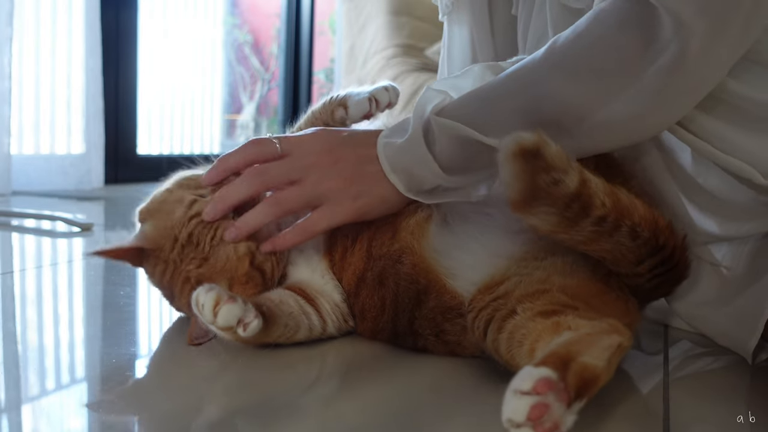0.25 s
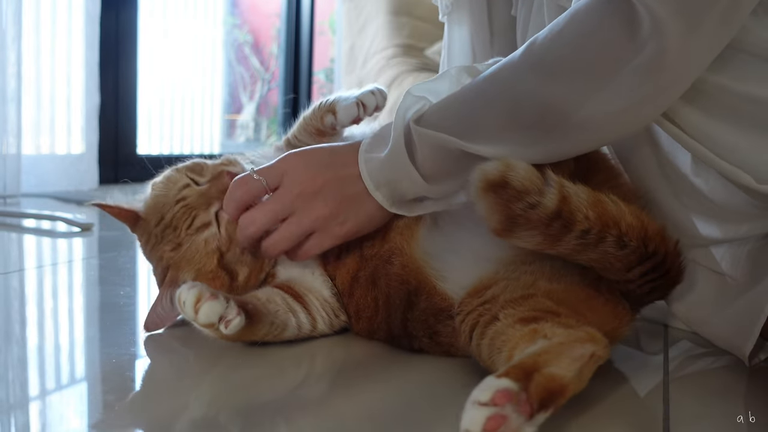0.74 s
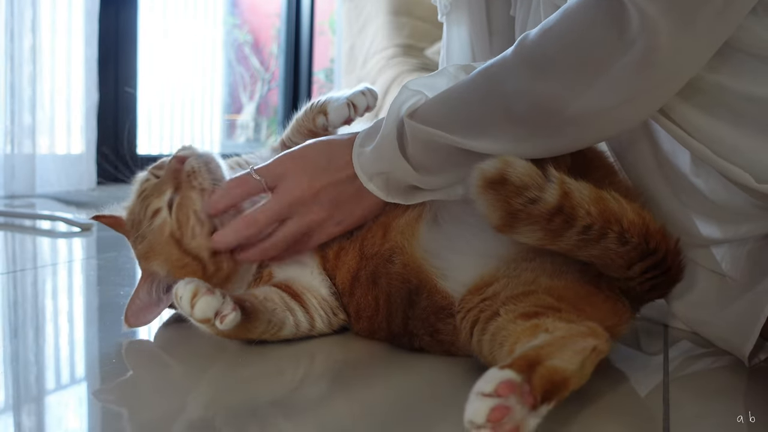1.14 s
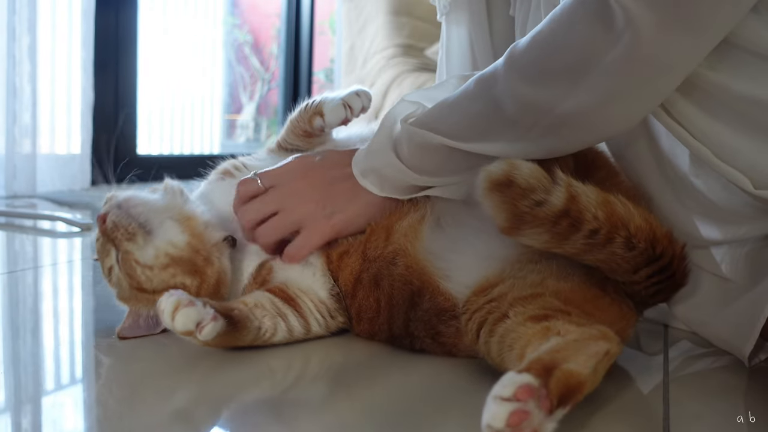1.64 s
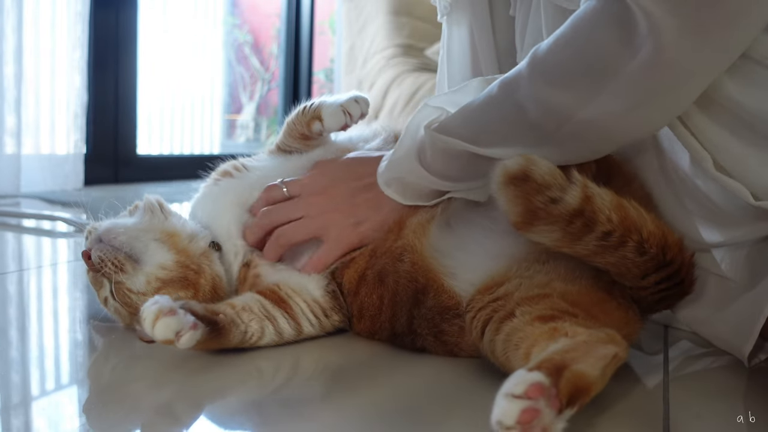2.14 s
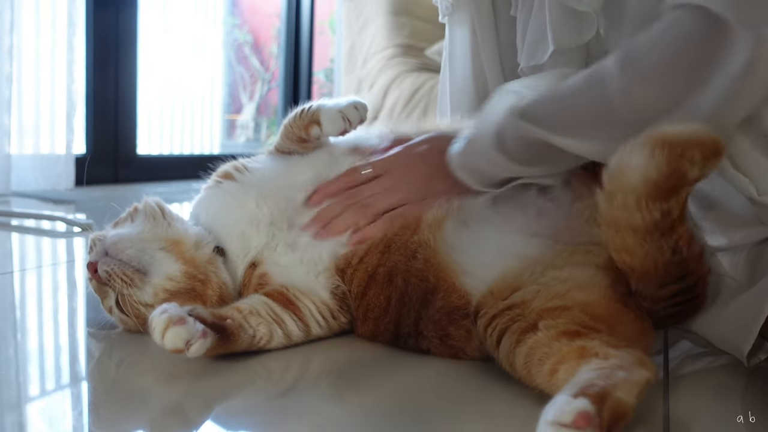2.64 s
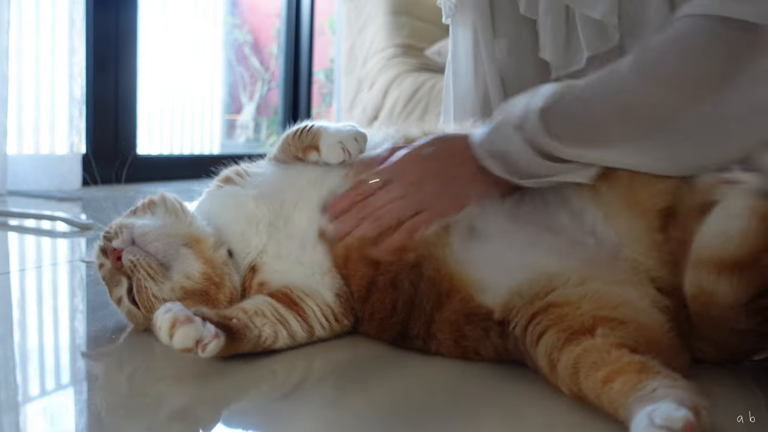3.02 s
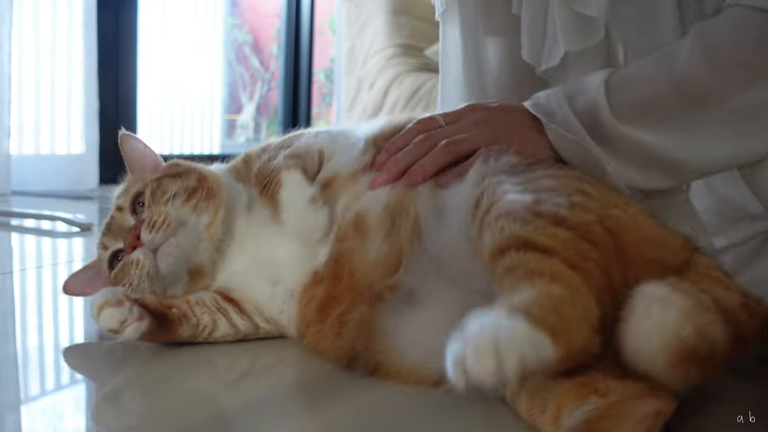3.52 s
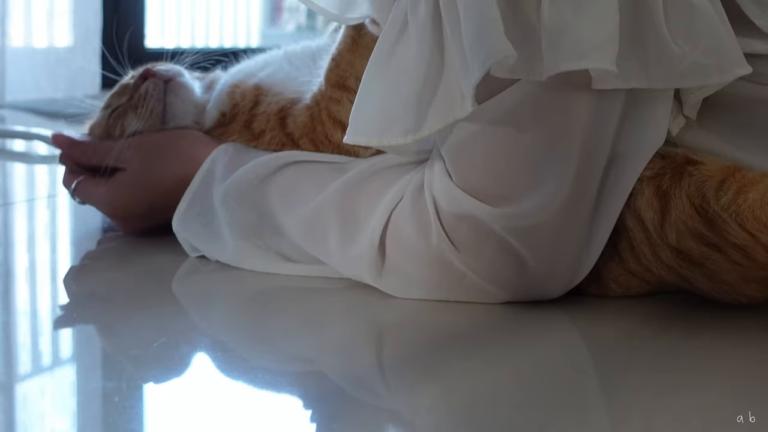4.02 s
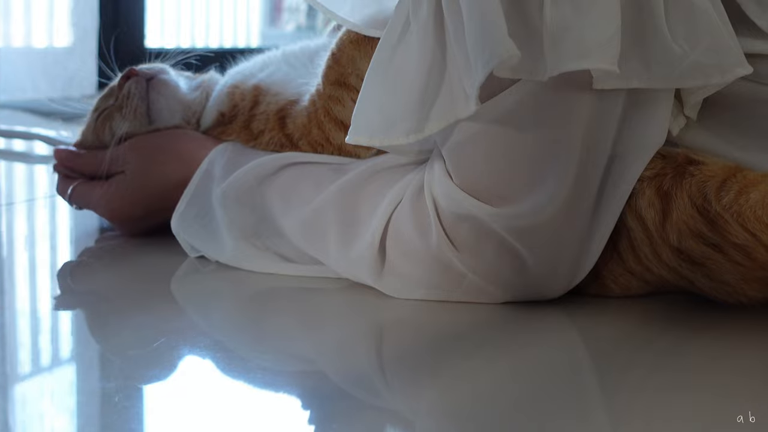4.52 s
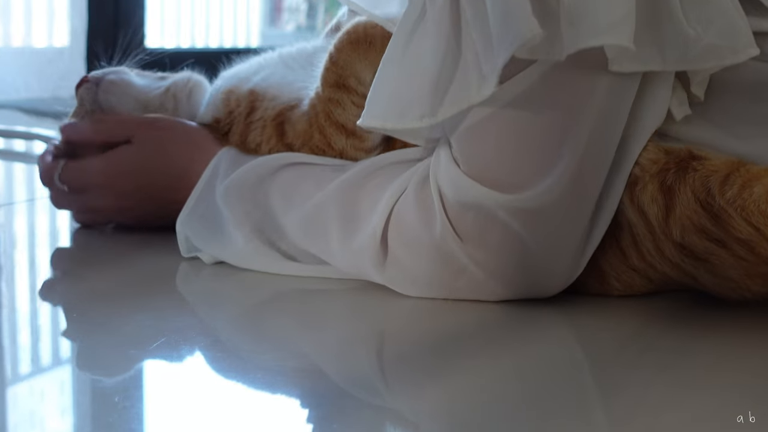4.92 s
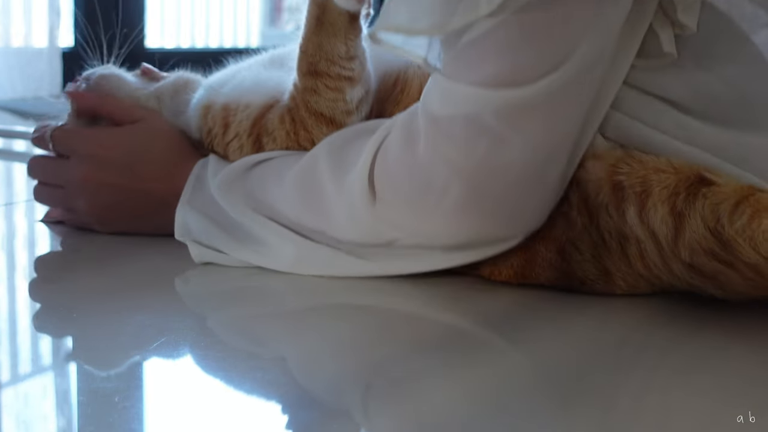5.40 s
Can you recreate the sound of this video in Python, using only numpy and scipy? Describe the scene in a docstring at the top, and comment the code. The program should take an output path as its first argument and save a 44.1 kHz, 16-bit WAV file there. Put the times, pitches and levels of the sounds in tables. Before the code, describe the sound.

A close stereo pickup in a quiet, lightly reflective tiled room, with soft air noise and a faint, low, slightly wavering hum. A weak purr opens the scene, followed by clearer bursts at about 0.6 and 1.0 seconds, each a low, rapidly fluttering throaty voice with nasal rasp. Soft fur rustles come and go under a stroking hand, with tiny fingertip scratches. From about 1.4 to 1.9 seconds a collar bell gives a dry, bright, irregular rattle with very short ringing, thickest near 1.7, alongside the strongest purr. Further purrs with knocking edges come near 2.8 and 3.4 seconds, the latter with brisk fur brushing. Around 3.7 the purring stops and the background drops a little. Only faint rustling remains until a weak purr near 4.7, a thin sleeve swishing around 5.0 to 5.3, and a tiny scratch and barely audible purr near 5.5.

```python
"""Purring cat on a tiled floor

A cat purrs in short, voiced bursts while a hand strokes it. Its larynx opens about thirty times
a second, each time on a few rough cycles near 200 Hz, coloured by throat and nose resonances.
Impulses ring the collar bell as the cat rolls over; shaped noise makes the rustling fur and the
sliding thin sleeve. A wavering sine hums over soft room air, and the background drops midway.
"""
import sys
import numpy as np
from scipy import signal
from scipy.fft import rfft, irfft
from scipy.io import wavfile
from scipy.ndimage import uniform_filter1d, map_coordinates

SR = 44100
rng = np.random.default_rng(int(sys.argv[2]) if len(sys.argv) > 2 else 0)


def transcribe(u):
    """Save the signal u as a 16-bit wav file named by the first command-line argument.

    u: samples, shape (n,) or (channels, n), limited to [-1, 1]; the rate is SR.
    q: integer samples, one column per channel.
    """
    v = np.clip(np.atleast_2d(u).T, -1, 1)
    q = np.round(v * 32767).astype(np.int16)
    wavfile.write(sys.argv[1], SR, q)


N = 249605
TIME = np.arange(N) / SR


def from_db(db):
    """Decibels to gain."""
    return 10 ** (np.asarray(db) / 20)


def rms_one(x):
    """Scale to rms 1."""
    return x / np.sqrt(np.mean(x ** 2) + 1e-20)


def bump(middle, spread):
    """Gaussian swell over time, peak 1; spread is its standard deviation in seconds."""
    return np.exp(-.5 * ((TIME - middle) / spread) ** 2)


def crest(t, start, length):
    """Half a sine over a span, zero outside it."""
    return np.sin(np.pi * np.clip((t - start) / length, 0, 1))


def drift(rate):
    """Random wander of rms 1: straight lines between `rate` random points a second."""
    knots = rng.standard_normal(4000)
    return rms_one(map_coordinates(knots, [TIME * rate], order=1, mode="wrap"))


# left-right likeness of the noises: (frequency [Hz], correlation [0 to 1])
EAR_LIKENESS = [(60, 0.84), (150, 0.99), (380, 0.76), (950, 0.59), (2380, 0.62), (5980, 0.79), (15000, 1)]


def noise(spectrum):
    """Stereo noise of a given colour, rms 1, with the ears less alike where likeness is low."""
    log_hz = np.log(np.arange(N // 2 + 1) * SR / N + 1)

    def curve(table):
        hz, value = np.transpose(table)
        return np.interp(log_hz, np.log(hz), value)

    alike = np.clip(curve(EAR_LIKENESS), 0, 1)
    mid, side = rfft(rng.standard_normal((2, N)))
    ears = np.sqrt(1 + alike) * mid + np.sqrt(1 - alike) * side * [[1], [-1]]
    return rms_one(irfft(from_db(curve(spectrum)) * ears, N))


def resonate(x, resonances):
    """Parallel resonances of alternating polarity, each passed twice for dark valleys."""
    out = 0
    for k, (hz, width, db) in enumerate(resonances):
        r = np.exp(-np.pi * width / SR)
        section = [(1 - r * r) / 2, 0, (r * r - 1) / 2, 1, -2 * r * np.cos(2 * np.pi * hz / SR), r * r]
        out = out + (-1) ** k * from_db(db) * signal.sosfilt([section, section], x + 1e-18)
    return out


def clicks(times, sizes):
    """Single-sample impulses."""
    out = np.zeros(N)
    samples = np.round(np.asarray(times) * SR).astype(int)
    np.add.at(out, np.clip(samples, 0, N - 1), sizes)
    return out


def room(x, t60, wet_db):
    """A short diffuse tail from tiles and walls, different at each ear."""
    t = TIME[:SR // 2]
    tail = rng.standard_normal((2, len(t))) * from_db(-60 * t / t60) * (t > .004)
    tail /= np.sqrt(np.sum(tail ** 2, axis=1, keepdims=True))
    return x + from_db(wet_db) * signal.fftconvolve(x, tail, axes=1)[:, :N]


def narrowed(x, width):
    """Shrink the difference between the ears."""
    mid = x.mean(axis=0)
    return mid + width * (x - mid)


QUIETER_AT_S, QUIETER_DB = 3.69, -3


def quieter():
    """Gain that steps down when the background drops."""
    return from_db(QUIETER_DB * (TIME > QUIETER_AT_S))


HUM_HZ, HUM_DB = 93.4, -55   # level is the rms before the drop


def hum():
    """An appliance hums: a sine whose phase and level waver."""
    phase = 2 * np.pi * HUM_HZ * TIME + 0.092 * drift(18)
    return np.sqrt(2) * np.sin(phase) * from_db(HUM_DB + 0.99 * drift(17))


AIR_DB = -55.5   # shared by air and rumble, before the drop
# colour of the room air: (frequency [Hz], relative density [dB])
AIR_COLOUR = [(20, -62), (45, -27), (110, -9.5), (160, -4.5), (260, -8.5), (330, -12), (480, -21.5),
              (780, -24.5), (1050, -21.5), (1550, -26), (2300, -31), (3700, -36.5), (4500, -40.5),
              (15600, -46)]
# colour of the low rumble: (frequency [Hz], relative density [dB])
RUMBLE_COLOUR = [(20, -36), (40, -12), (60, -15), (75, 5), (110, -15.5), (150, -18), (400, -60)]


def room_air(rumble_db):
    """Soft, gently fluctuating broadband noise over a steady low rumble."""
    air = noise(AIR_COLOUR) * from_db(.5 * drift(60))
    rumble = from_db(rumble_db) * noise(RUMBLE_COLOUR)
    return from_db(AIR_DB) * (air + rumble)


def background(rumble_db):
    """Hum and room air, dropping together."""
    return quieter() * (hum() + room_air(rumble_db))


# slides of the sleeve, a light drag and a fast slide in the middle of it:
# (start [s], end [s], attack time constant [s], release time constant [s], relative level [dB])
SLEEVE_SLIDES = [(4.958, 5.304, 0.069, 0.091, -59), (4.984, 5.227, 0.011, 0.022, -51)]
SLIDE_CREST_DB = 2.5


def sliding():
    """Speed of the sleeve: each slide picks up, crests and dies away."""
    speed = 0
    for start, end, attack, release, db in SLEEVE_SLIDES:
        early, late = np.maximum(0, start - TIME), np.maximum(0, TIME - end)
        peak = from_db(db + SLIDE_CREST_DB * crest(TIME, start, end - start))
        speed = speed + peak * np.exp(-early / attack - late / release)
    return speed


# colour of the sleeve's hiss: (frequency [Hz], relative density [dB])
SLEEVE_COLOUR = [(900, -14.5), (1700, -15.5), (2050, -5.5), (2300, 3), (2650, -5), (3300, -20),
                 (4500, -7.5), (5550, -21.5), (6800, -10), (8000, -19.5), (9400, -12.5), (10900, -24.5),
                 (11600, -22), (13000, -28)]
# narrow noise bands that add uneven colour to the swish:
# (frequency [Hz], width per filter pass [Hz], relative level [dB])
SWISH_BANDS = [(1740, 41, -12), (2150, 20.4, -17), (2070, 17, -21), (2100, 23, -5), (2165, 79, -3),
               (2520, 28, -9), (2730, 27, -22), (2610, 19.1, -7)]


def sleeve(hiss_db, bands_db, brightening):
    """Thin cloth swishes along; the hiss grows faster with speed than its narrow bands do."""
    speed = sliding()
    hiss_gain = from_db(hiss_db + 1.45 * drift(180)) * (speed / speed.max()) ** brightening
    hiss = hiss_gain * noise(SLEEVE_COLOUR)
    bands = from_db(bands_db) * rms_one(resonate(rng.standard_normal(N), SWISH_BANDS))
    return speed * (hiss + bands) * from_db([[.4], [-.4]])


# strokes of the hand through the fur: (middle [s], Gaussian spread [s],
# relative soft rustle level [dB], relative bright brushing level [dB])
HAND_STROKES = [(0.342, 0.022, -63.5, -66), (0.578, 0.061, -60, -69), (0.758, 0.049, -62, -84),
                (1.104, 0.095, -63.5, -87), (1.74, 0.047, -67, -55), (1.848, 0.093, -61.5, -63.5),
                (2.23, 0.19, -65.5, -70), (2.852, 0.11, -65.5, -63), (3.06, 0.089, -64.5, -68),
                (3.433, .042, -58.5, -55), (3.537, 0.054, -62, -59.5), (3.847, .10, -70.5, -82),
                (4.664, .09, -73, -71)]
RESTING_SOFT_DB, RESTING_BRIGHT_DB = -73.5, -76.5   # on the same scales: the hand never lies quite still


def stroking():
    """Gains of soft rustle and bright brushing: each stroke swells and fades over the resting hand."""
    soft = from_db(RESTING_SOFT_DB) * quieter()
    bright = from_db(RESTING_BRIGHT_DB) * quieter()
    for middle, spread, soft_db, bright_db in HAND_STROKES:
        speed = bump(middle, spread)
        soft = np.hypot(soft, from_db(soft_db) * speed)
        bright = np.hypot(bright, from_db(bright_db) * speed)
    return soft, bright


# fingertips scratch through the coat:
# (middle [s], Gaussian spread [s], centre frequency [Hz], relative level [dB])
FINGER_SCRATCHES = [(0.343, 0.042, 3880, -71.5), (0.516, 0.011, 8500, -69.5), (1.088, .014, 8000, -74),
                    (1.312, .003, 8460, -73), (2.161, .023, 9150, -74), (2.259, 0.0027, 3000, -67),
                    (2.276, 0.019, 3470, -73.5), (2.86, 0.11, 9600, -74.5), (3.29, 0.024, 11580, -76),
                    (5.508, 0.0025, 1290, -58)]


def scratching(scratch_db, scratch_width):
    """Fingertip catches: flickering noise through one resonance, as wide as a share of its centre."""
    catches = rng.standard_normal(N) * from_db(1.7 * drift(400))
    out = 0
    for middle, spread, hz, db in FINGER_SCRATCHES:
        scratch = rms_one(resonate(catches, [(hz, scratch_width * hz, 0)]))
        out = out + from_db(db + scratch_db) * bump(middle, spread) * scratch
    return out


# colour of the soft rustle: (frequency [Hz], relative density [dB])
FUR_COLOUR = [(900, -44), (1800, 2.5), (2600, 6.5), (3300, -3.5), (4000, 1), (5000, -7.5), (7000, -11),
              (8000, -10), (9600, -10), (12000, -18), (16000, -19)]
# colour of the bright brushing: (frequency [Hz], relative density [dB])
BRUSH_COLOUR = [(3000, -33), (4700, -7.5), (5600, 3.5), (6400, 4), (7400, -2.5), (8600, -6.5), (9600, -39),
                (16000, -55)]


def rustle(fur_db, brush_db, scratch_db, scratch_width):
    """Hairs slip under the hand in countless tiny catches, heard as flickering noise."""
    soft, bright = stroking()
    fur = from_db(fur_db + 3.4 * drift(300)) * soft * noise(FUR_COLOUR)
    brush = from_db(brush_db + 3.1 * drift(250)) * bright * noise(BRUSH_COLOUR)
    return fur + brush + scratching(scratch_db, scratch_width)


# first of the faint touches: (relative clack level [dB], low ring [dB], high ring [dB])
FIRST_TOUCH = [-64, -60, -76]
SETTLE_START_S, SETTLE_GAP_S, SETTLE_DB_PER_S = 1.78, 0.057, 65


def settling(count=8):
    """The pellet rolls to rest in ever fainter, unevenly spaced touches: rows like the strikes."""
    after = SETTLE_GAP_S * (np.arange(count) + rng.uniform(-0.85, 0.54, count))
    levels = np.array(FIRST_TOUCH) - SETTLE_DB_PER_S * after[:, None]
    return np.column_stack([SETTLE_START_S + after, levels])


# the pellet strikes the collar bell:
# (time [s], relative clack level [dB], relative low ring level [dB], relative high ring level [dB])
BELL_STRIKES = [(1.438, -55, -66, -71), (1.499, -61, -64.5, -98), (1.5428, -34.5, -48.5, -76),
                (1.560, -36, -68, -82), (1.5977, -37.5, -54.5, -89), (1.627, -45, -58, -87),
                (1.669, -51, -58, -84), (1.6888, -33, -44.5, -60), (1.6925, -36, -65, -79),
                (1.6955, -37, -43.5, -89), (1.6985, -38, -48, -79), (1.712, -39, -69, -57),
                (1.7305, -29.5, -60, -55.5), (1.923, -50, -85, -84)]
# resonances of the dry clack: (frequency [Hz], width per filter pass [Hz], relative level [dB])
BELL_CLACK = [(4797, 330, 10), (6060, 610, 2.5), (6870, 830, 0), (9000, 3400, -30)]
# ringing modes of the shell: (frequency [Hz], relative level [dB], decay by 60 dB [s])
BELL_MODES = [(4740, -5, .04), (4812, -6, .15), (4867, -2, .2), (5114, -15, .1), (6180, -18, .08),
              (11170, -7, .16), (11980, -1, .16)]


def bell(clack_db, ring_db):
    """Every strike gives a dry clack and sets the shell's low and high modes ringing."""
    at, clack, low, high = np.vstack([BELL_STRIKES, settling()]).T
    out = from_db(clack_db) * resonate(clicks(at, from_db(clack)), BELL_CLACK)
    for hz, db, t60 in BELL_MODES:
        r, w = from_db(-60 / (t60 * SR)), 2 * np.pi * hz / SR
        level = high if hz > SR / 5 else low
        uneven_db = rng.normal(0, 1, len(at))
        strikes = clicks(at, from_db(level + db + ring_db + uneven_db))
        out = out + signal.lfilter([0, np.sin(w)], [1, -2 * r * np.cos(w), r * r], strikes + 1e-18)
    return out * from_db([[.7], [-.7]])


CREST_DB, TAIL_DB_PER_S = 1.4, 19   # a burst crests in mid-hold, then lingers softly
ATTACK_S, ATTACK_PER_HOLD = 0.018, 0.1   # Gaussian spread of the attack; long bursts build more slowly


def effort(t, start, hold, release, tail_db):
    """Gain of one burst: a rounded attack, a cresting hold, a quick release into a soft tail."""
    early, late = np.maximum(0, start - t), np.maximum(0, t - start - hold)
    fall_db = np.maximum(-release * late, tail_db - TAIL_DB_PER_S * late)
    attack = np.exp(-.5 * (early / (ATTACK_S + ATTACK_PER_HOLD * hold)) ** 2)
    return from_db(CREST_DB * crest(t, start, hold) + fall_db) * attack


# bursts of purring: (full voice at [s], hold [s], release [dB per s], time between openings [s],
# starting pitch before spread and arch [Hz], relative tone, growl and rasp levels [dB, dB, dB])
PURR_BURSTS = [(0.053, .012, 158, 0.029, 211.1, -41.5, -57.5, -64),
               (.560, .068, 420, .034, 232.1, -28.5, -47.5, -60.5),
               (1.020, .078, 402, .026, 217.9, -35.5, -52, -63.5),
               (1.694, .185, 210, 0.033, 205.9, -26, -44.5, -52),
               (2.752, .190, 152, 0.033, 196.2, -30.5, -53, -56.5),
               (3.383, .062, 128, .0312, 191, -28.5, -45.5, -52.5),
               (4.688, .010, 204, .036, 187.9, -42, -65.5, -63.5),
               (5.517, .030, 250, .038, 194.3, -44, -79, -65)]
TONE_TAIL_DB, GROWL_TAIL_DB, RASP_TAIL_DB = -23, -16.5, -8
SAG_HZ_PER_S = 40   # pitch falls through the hold
OPENING_SPREAD_DB, OPENING_SPREAD_HZ = 1.9, 10   # no two openings are alike


def openings(lead_count=2, count=40):
    """A steady beat until the next burst takes over: (time, pitch, tone gain, rasp gain) per opening."""
    rows = []
    ends = [start - (lead_count + .5) * period for start, _, _, period, *_ in PURR_BURSTS[1:]]
    ends.append(TIME[-1])
    for (start, hold, release, period, hz, tone_db, _, rasp_db), end in zip(PURR_BURSTS, ends):
        at = start + period * (np.arange(count) - lead_count)
        off_pitch, off_level = rng.standard_normal((2, count))
        sag = SAG_HZ_PER_S * np.clip(at - start, 0, hold)
        pitch = hz - sag + OPENING_SPREAD_HZ * off_pitch
        tone_gain = from_db(tone_db + OPENING_SPREAD_DB * off_level)
        tone = tone_gain * effort(at, start, hold, release, TONE_TAIL_DB)
        rasp = from_db(rasp_db) * effort(at, start, hold, release, RASP_TAIL_DB)
        rows.extend(np.transpose([at, pitch, tone, rasp])[at < end])
    return np.transpose(rows)


RASP_LEAD_S = 0.0077   # air rasps through the nose a little ahead of the voice


def airflow():
    """Gains of the growl and of the rasp over all bursts."""
    growl = rasp = 0
    for start, hold, release, _, _, _, growl_db, rasp_db in PURR_BURSTS:
        growl_effort = effort(TIME, start, hold, release, GROWL_TAIL_DB)
        rasp_effort = effort(TIME + RASP_LEAD_S, start, hold, release, RASP_TAIL_DB)
        growl = np.maximum(growl, from_db(growl_db) * growl_effort)
        rasp = np.maximum(rasp, from_db(rasp_db) * rasp_effort)
    return growl, rasp


def larynx(at, hz, strength, open_s, arch, jitter):
    """Each opening swells and fades; the pitch rises with it and sags as the folds close."""
    coarse = TIME[::20]
    bumps = np.exp(-.5 * ((coarse[:, None] - at) / open_s) ** 2)
    swell = np.interp(TIME, coarse, bumps @ strength)
    opening = np.interp(TIME, coarse, bumps.sum(axis=1))
    pitch = np.interp(TIME, at, hz) * (1 + arch * (opening - .9) + jitter * drift(220))
    return swell, opening, np.cumsum(pitch) / SR


def fold_slaps(cycles, uneven_db, turbulence):
    """The folds slap shut once a cycle, never equally hard, and let a puff of turbulence through."""
    shut = np.diff(np.floor(cycles), prepend=0) * np.sqrt(SR / 200)   # rms near 1 at 200 slaps a second
    puff = (.5 + .5 * np.cos(2 * np.pi * cycles)) ** 4
    return (shut + turbulence * puff * rng.standard_normal(N)) * from_db(uneven_db * drift(200))


def evened(x):
    """Hold the level steady over about two openings."""
    return x / np.sqrt(uniform_filter1d(x ** 2, size=2600) + 1e-12)


# resonances of the nose: (frequency [Hz], width per filter pass [Hz], relative level [dB])
NOSE_RESONANCES = [(946, 195, 6), (1240, 430, 0.5), (1520, 230, 0.5)]
# a few closures stand out as hard knocks: (time [s], impulse level before the nose [dB])
LOUD_KNOCKS = [(0.625, -21), (1.664, -23), (1.709, -10), (1.836, -7), (2.701, -15.5), (2.725, -17.5),
               (2.76, -11.5), (2.821, -15.5), (3.388, -9.5)]
KNOCK_LAG_S, KNOCK_SPREAD_S, KNOCK_SPREAD_DB = .007, .003, 5.5


def fold_knocks(at, force, knock_db):
    """The folds knock together late in each opening, impulses that ring the nose."""
    off_time, off_level = rng.standard_normal((len(at), 2)).T
    late = at + KNOCK_LAG_S + KNOCK_SPREAD_S * off_time
    closures = clicks(late, force * from_db(knock_db + KNOCK_SPREAD_DB * off_level))
    hard_s, hard_db = np.transpose(LOUD_KNOCKS)
    return resonate(closures + clicks(hard_s, from_db(hard_db)), NOSE_RESONANCES)


PURR_RESUMES_S = 4.55


def pause():
    """The purr breaks off when the background drops, and comes back later."""
    silent = (TIME > QUIETER_AT_S) * (TIME < PURR_RESUMES_S)
    return uniform_filter1d(1.0 - silent, size=400)


# resonances of the closed mouth: (frequency [Hz], width per filter pass [Hz], relative level [dB])
THROAT_RESONANCES = [(364, 74, -0.5), (475, 137, -5.5), (534, 69, -4)]
# colour of the ribcage murmur: (frequency [Hz], relative density [dB])
CHEST_COLOUR = [(25, -35), (60, -3.5), (115, -1), (155, 4.5), (260, 6), (600, -14.5), (2000, -27),
                (5000, -51), (16000, -62)]
# the head turns from side to side:
# (time [s], left minus right level [dB], trim of the lowest nasal resonance [dB])
HEAD_TURNS = [(0, 1, 12), (.55, -3, -16), (1.1, -7, -3), (1.7, 0.1, 8), (1.9, 1.5, 3.5), (2.85, -0.1, 6),
              (3.4, -2, 3), (4.7, 0.5, 5), (5.66, -2, 14)]


def purr(tone_db, growl_db, rasp_db, knock_db, flutter, chest_db):
    """A nearly pure fundamental, a rough throat growl, a nasal rasp, fold knocks and a chest murmur."""
    at, hz, strength, force = openings()
    swell, opening, cycles = larynx(at, hz, strength, open_s=.0086, arch=.22, jitter=.05)
    growl_gain, rasp_gain = airflow()
    turn_s, turn_pan, turn_nasal = np.transpose(HEAD_TURNS)
    pan_db = np.interp(TIME, turn_s, turn_pan)
    nasal_db = np.interp(TIME, turn_s, turn_nasal)
    # the overtones flare late in each opening, as the folds begin to collide
    closing = np.interp(TIME - .005, TIME, np.minimum(opening, 1))
    throb = 1 + flutter * (closing - .7)
    tone = from_db(tone_db) * swell * np.cos(2 * np.pi * cycles)
    slaps = fold_slaps(cycles, uneven_db=1.2, turbulence=1.4)
    growl = from_db(growl_db) * growl_gain * evened(resonate(slaps, THROAT_RESONANCES))
    low_nasal = from_db(nasal_db) * resonate(slaps, NOSE_RESONANCES[:1])
    high_nasal = resonate(slaps, NOSE_RESONANCES[1:])
    rasp = from_db(rasp_db) * rasp_gain * evened(low_nasal - high_nasal)
    knocks = fold_knocks(at, force, knock_db)
    # the ribcage murmurs along with each opening
    chest = from_db(chest_db) * swell * noise(CHEST_COLOUR)
    # the upper voice leaves through the nose, a little to the left of the body
    upper_voice = (throb * (growl + rasp) + knocks) * from_db([[1.1], [-1.1]])
    return (tone + chest + upper_voice) * from_db(pan_db * [[.5], [-.5]])


def scene():
    """The cat close by, in a quiet room."""
    surroundings = background(rumble_db=-16.0)
    cloth = narrowed(sleeve(hiss_db=-1.53, bands_db=-10.0, brightening=0.046), width=0.44)
    hand = rustle(fur_db=-8.0, brush_db=-9.5, scratch_db=0, scratch_width=0.39)
    collar = bell(clack_db=13.5, ring_db=2.0)
    cat = pause() * purr(tone_db=-2.25, growl_db=-0.5, rasp_db=0.0, knock_db=31.5, flutter=0.52,
                         chest_db=-13.5)
    near = room(cat + collar, t60=0.55, wet_db=-16)
    return near + hand + cloth + surroundings


CUTOFF_HZ = 15680


def record(dry):
    """The top is cut steeply by an elliptic low-pass."""
    return signal.sosfilt(signal.ellip(14, .1, 80, CUTOFF_HZ, fs=SR, output="sos"), dry)


dry = scene()
out = record(dry)
transcribe(out)
```